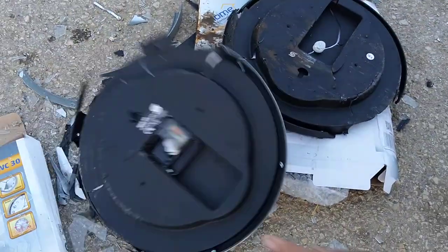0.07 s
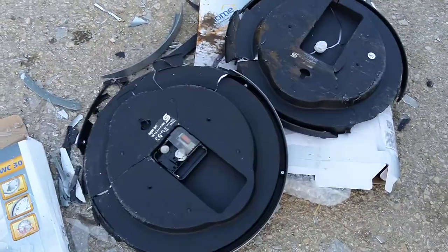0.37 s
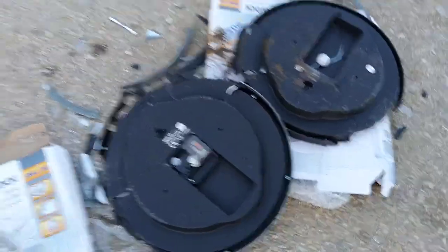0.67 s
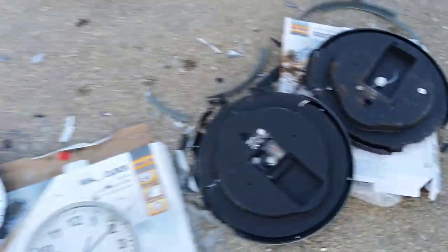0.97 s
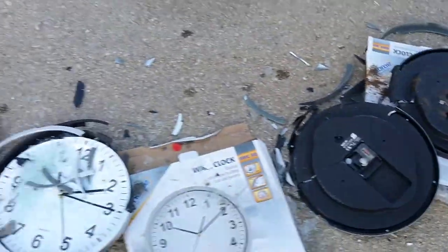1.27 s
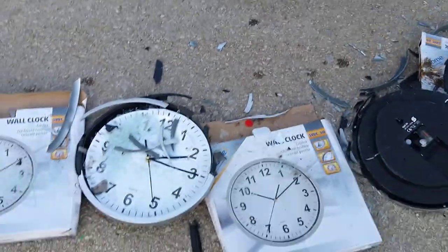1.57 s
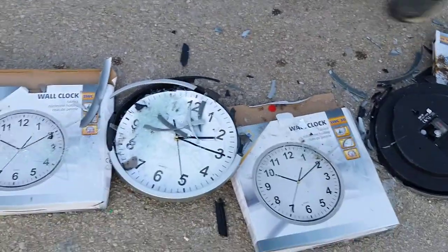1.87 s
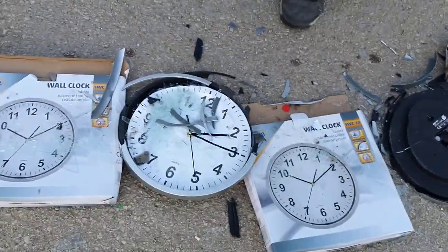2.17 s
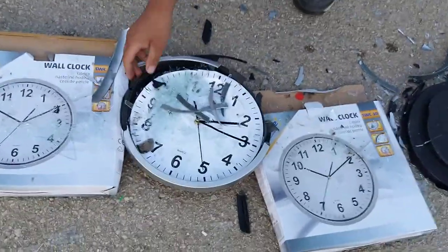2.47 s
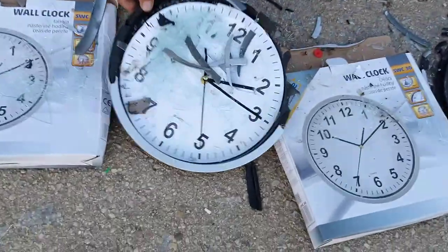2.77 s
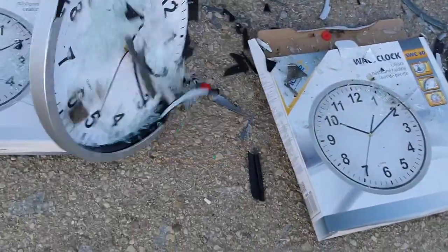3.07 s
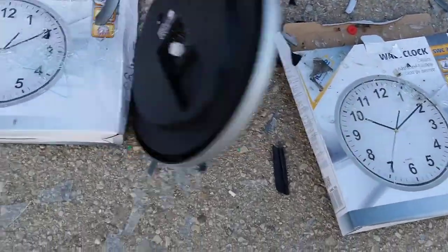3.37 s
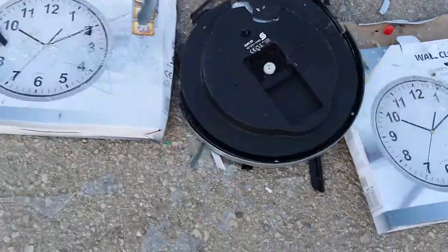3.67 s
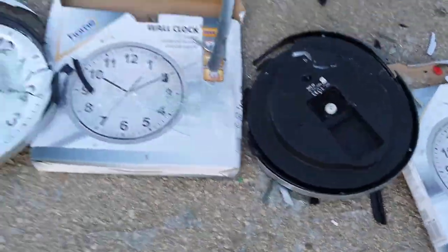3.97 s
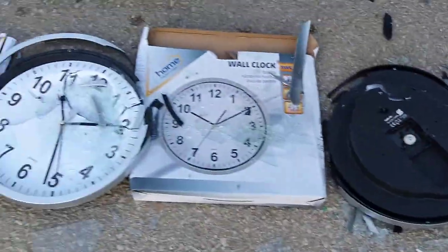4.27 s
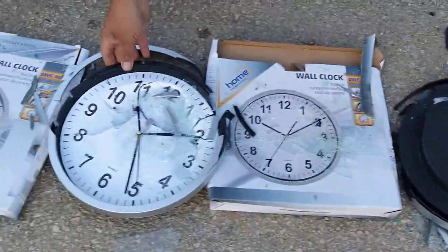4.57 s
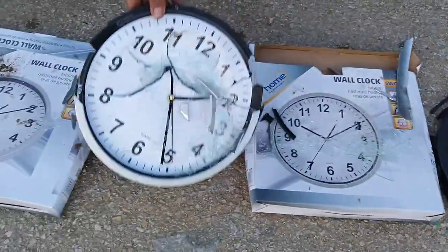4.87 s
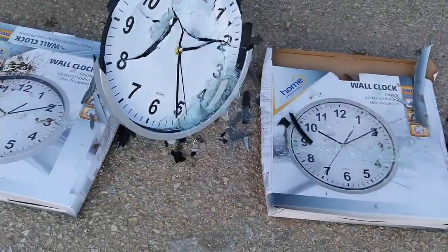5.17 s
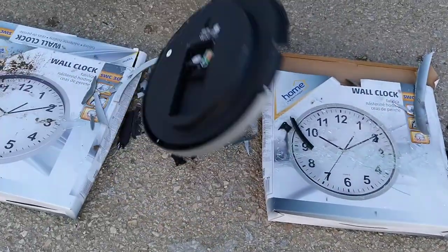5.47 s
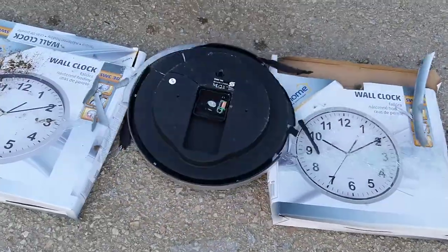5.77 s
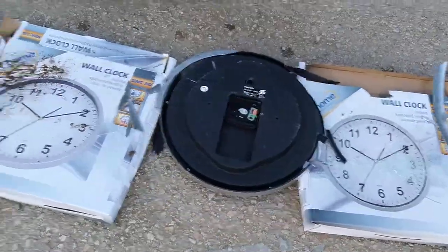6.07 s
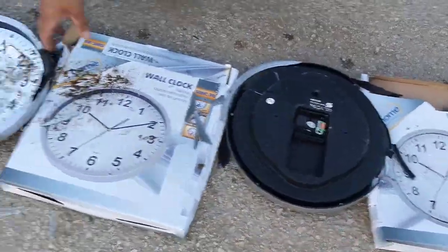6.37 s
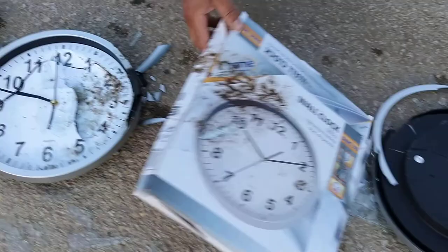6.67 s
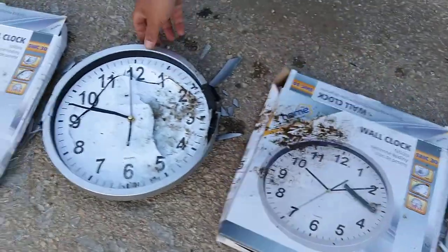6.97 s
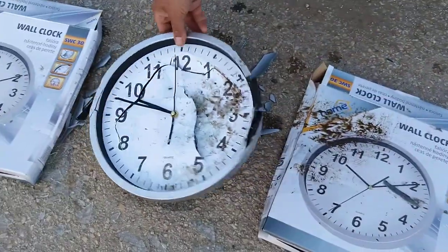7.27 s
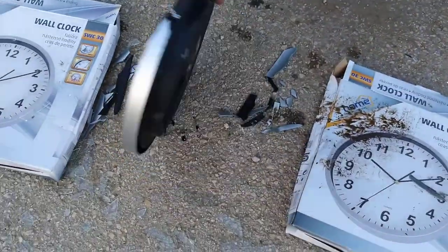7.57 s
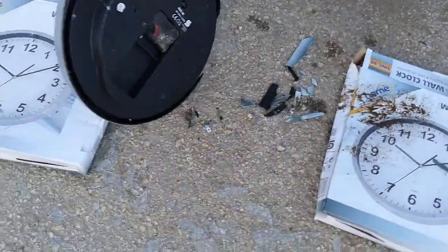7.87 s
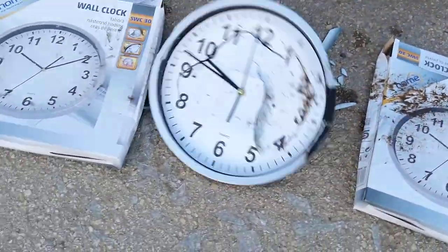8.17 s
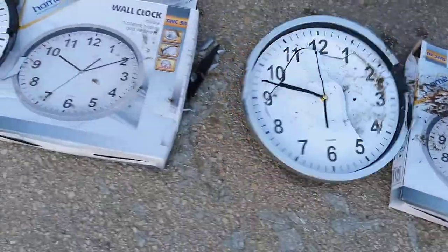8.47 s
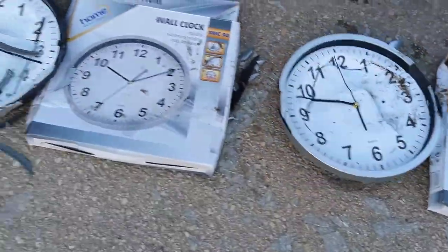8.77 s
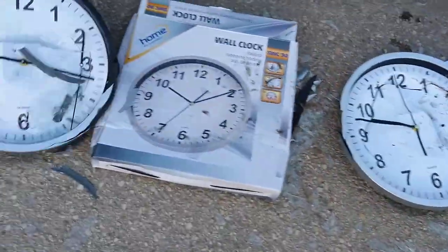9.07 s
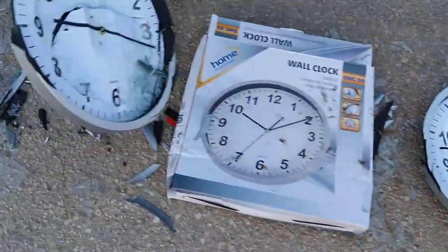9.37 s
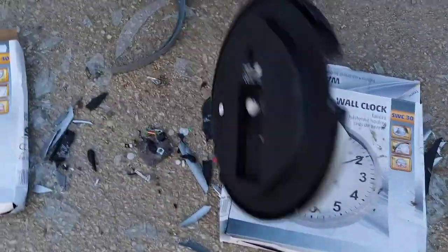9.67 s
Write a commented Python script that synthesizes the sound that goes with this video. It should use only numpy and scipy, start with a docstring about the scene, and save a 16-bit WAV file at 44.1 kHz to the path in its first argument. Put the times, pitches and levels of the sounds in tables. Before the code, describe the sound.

Smashed plastic clocks scrape, knock and crunch on gritty pavement, spilling tinkling glass as a breeze buffets the microphone.

```python
"""On rough pavement outdoors, smashed plastic wall clocks are lifted, turned over and dropped.
Their hollow cases scrape, knock and rock to rest; grit crunches and snaps under rims and shoes.
Broken glass slides out, ticking and ringing; larger shards land and tinkle.
A breeze buffets the nearby microphone over faint town noise."""
import sys
import numpy as np
from scipy import signal
from scipy.fft import rfft, irfft, next_fast_len
from scipy.io import wavfile
from scipy.ndimage import uniform_filter1d, map_coordinates

SR = 44100
rng = np.random.default_rng(int(sys.argv[2]) if len(sys.argv) > 2 else 0)


def store_pcm(level_fs):
    """Save levels as 16-bit WAV."""
    pcm = np.round(np.clip(level_fs, -1, 1) * 32767).astype(np.int16)
    wavfile.write(sys.argv[1], SR, np.atleast_2d(pcm).T)


N = 432621

# Spectrum of crushed grit. Each row: frequency in Hz, level in dB.
GRIT_SPECTRUM = [(700, -10.5), (1600, 5.5), (2300, 3), (4000, 2.5), (6200, -2), (7800, -2.5), (8600, -12.5),
                 (10500, -11.5), (13000, -21), (16000, -39)]
# Spectrum of the booming hollow case. Each row: frequency in Hz, level in dB.
HOLLOW_SPECTRUM = [(120, -26), (300, -22), (400, -7), (550, -1.5), (800, 0), (1000, -3.5), (1280, -4),
                   (1500, -14.5), (2400, -13.5), (5000, -39)]


def amp(db):
    """Decibels to gain."""
    return 10 ** (np.asarray(db) / 20)


def unit(x):
    """Scale to rms 1."""
    return x / np.sqrt(np.mean(x ** 2) + 1e-20)


def peaked(x):
    """Scale to peak 1."""
    return x / np.abs(x).max()


def along(points, hz):
    """Read (Hz, value) points on a log frequency axis."""
    knots_hz, values = np.transpose(points)
    return np.interp(np.log(hz + 1), np.log(knots_hz + 1), values)


def wobble(knots_per_s):
    """Smooth random curve."""
    knots = rng.standard_normal(int(N * knots_per_s / SR) + 4)
    fine = map_coordinates(knots, [np.arange(len(knots) * 10) / 10])
    return np.interp(np.arange(N) * knots_per_s * 10 / SR, np.arange(len(fine)), fine)


def filtered(x, response):
    """Apply a gain given as a function of Hz."""
    size = next_fast_len(x.shape[-1] + 8192, True)
    return irfft(rfft(x, size) * response(np.fft.rfftfreq(size, 1 / SR)), size)[..., :x.shape[-1]]


def coloured(x, spectrum, size=2048):
    """Minimum-phase filter that keeps the power of white noise."""
    gain = unit(amp(along(spectrum, np.fft.rfftfreq(size, 1 / SR))))
    cepstrum = irfft(np.log(gain))
    cepstrum[1:size // 2] *= 2
    cepstrum[size // 2 + 1:] = 0
    impulse = irfft(np.exp(rfft(cepstrum)))
    return signal.oaconvolve(x, impulse[None], axes=1)[:, :x.shape[-1]]


def add(track, start_s, sound):
    """Mix a sound into the track."""
    start = max(round(start_s * SR), 0)
    part = sound[..., :max(N - start, 0)]
    track[..., start:start + part.shape[-1]] += part


def burst(t60_s, size):
    """Dense modes dying together: a direct and a scattered channel, each of energy about 1."""
    noise = rng.standard_normal((2, size)) * amp(-60 * np.arange(size) / SR / t60_s)
    return unit(noise) / np.sqrt(size)


def impacts(per_s, spread_db, t60_s, points=3, size=1500):
    """Tiny uneven impacts at moving contact points, whose rings change from block to block."""
    count = int(per_s / points * N / SR) + 1
    out = np.zeros((2, N))
    for _ in range(points):
        strengths = amp(spread_db * np.clip(rng.standard_normal(count), -2, 2))
        strengths *= rng.choice([-1, 1], count)
        taps = np.bincount(rng.integers(0, N, count), strengths, N)
        for start in range(0, N, size):
            block = taps[None, start:start + size]
            add(out, start / SR, signal.fftconvolve(block, burst(t60_s, size), axes=1))
    return out


def chatter(sound, rebound_db, span_s, count):
    """A light touch, the main contact a tenth of the span in, then weakening uneven rebounds."""
    when = rng.random(count)
    rebounds = amp(rebound_db) * (1 - when) * rng.choice([-1, 1], count)
    delays = np.round(SR * span_s * np.r_[0, .1, .1 + when]).astype(int)
    taps = np.bincount(delays, np.r_[.2, 1, rebounds])
    return signal.fftconvolve(sound, taps[None], axes=1)


def swells(events, column, rise_db_per_s, sag_db_per_s, fall_db_per_s):
    """Gain from one dB column: each event rises to its start, sags over its length, then dies away."""
    t = np.arange(0, N, 64) / SR
    power = np.zeros(len(t))
    for event in events:
        age_s, length_s = t - event[0], event[1]
        db = event[column] + rise_db_per_s * np.minimum(age_s, 0)
        db -= sag_db_per_s * np.clip(age_s, 0, length_s)
        db -= fall_db_per_s * np.maximum(age_s - length_s, 0)
        power += amp(np.maximum(db, -150)) ** 2
    return np.interp(np.arange(N) / SR, t, np.sqrt(power))


def scrape_gain(column):
    """Envelope of a clock, its box or a shoe pushed over the ground."""
    # Each row: start in seconds, length in seconds, case level in dB, grit level in dB.
    scrapes = [(0.0, 0.052, -35, -36), (0.145, 0.075, -30.5, -33), (1.62, 0.167, -57, -68),
               (2.0, 0.15, -62, -71.5), (2.67, .14, -38.5, -48.5), (2.92, 0.089, -29, -27),
               (3.08, 0.17, -46, -26.5), (3.36, 0.27, -36, -37), (4.49, 0.17, -33.5, -45),
               (4.73, 0.069, -29, -39), (4.805, 0.055, -24.5, -24), (4.93, 0.27, -36.5, -28.5),
               (5.5, 0.15, -82, -37.5), (6.485, 0.15, -30, -38), (6.7, 0.388, -36, -42.5),
               (7.2, 0.0237, -35, -44.5), (7.39, 0.11, -32, -32.5), (7.57, 0.17, -51.5, -35.5),
               (7.81, 0.19, -31, -40.5), (8.03, 0.19, -31.5, -36.5), (8.54, 0.041, -29.5, -29.5),
               (8.78, 0.051, -31, -33.5), (8.91, 0.16, -41.5, -38.5), (9.04, 0.056, -27.5, -26),
               (9.18, .06, -38, -32.5), (9.3, 0.23, -43, -35), (9.77, .05, -24.5, -31)]
    return swells(scrapes, column, rise_db_per_s=217.5, sag_db_per_s=3, fall_db_per_s=176)


def grit_gain():
    """Envelope of the grit under scraping and rocking together."""
    return np.hypot(scrape_gain(column=3), rocking_gain(column=3))


def rim_on_pavement(rattle_db, boom_db, grit_db, judder_db, snaps_db):
    """A rim judders over stones: the case rattles, or booms as it rocks; grit grinds and snaps."""
    # Rattling case. Each row: frequency in Hz, level in dB.
    rattle_spectrum = [(120, -38.5), (310, -12), (450, -3), (750, 0.5), (1250, -1), (1700, -6.5),
                       (2400, -13), (5000, -40.5)]
    judder = amp(judder_db * wobble(55))
    taps = judder * impacts(per_s=1000, spread_db=4.5, t60_s=0.04)
    rattle = amp(rattle_db) * scrape_gain(column=2) * unit(coloured(taps, rattle_spectrum))
    boom = amp(boom_db) * rocking_gain(column=2) * unit(coloured(taps, HOLLOW_SPECTRUM))
    grinding = unit(judder * impacts(per_s=2800, spread_db=3, t60_s=0.012))
    grain_snaps = unit(impacts(per_s=87, spread_db=9.5, t60_s=0.014))
    grit = unit(coloured(grinding + amp(snaps_db) * grain_snaps, GRIT_SPECTRUM))
    return rattle + boom + amp(grit_db) * grit_gain() * grit


def sliding_glass(tick_db, ring_db, dust_db, mean_t60_s, count=260, size=3000):
    """Splinters slide out and tick together; loose ones skitter, each ringing at its own pitch."""
    # Each row: start in seconds, length in seconds, ticking level in dB, ringing level in dB.
    spills = [(0.0, .29, -39, -47), (3.19, 0.17, -21.5, -29), (3.42, 0.091, -39.5, -25),
              (3.57, .07, -34, -26), (4.73, 0.077, -42.5, -45), (4.8, 0.24, -31.5, -24),
              (5.06, 0.072, -33.5, -27), (5.3, 0.28, -40, -48.5), (5.59, 0.092, -35.5, -34.5),
              (6.58, 0.083, -41.5, -43), (6.84, 0.078, -36.5, -47.5), (7.5, 0.075, -45.5, -40),
              (7.7, 0.074, -29, -43), (8.08, 0.021, -32, -50), (9.03, 0.019, -30, -43),
              (9.43, 0.21, -45, -40), (9.77, .05, -36, -29)]
    # Each row: frequency in Hz, level in dB.
    glass_spectrum = [(2500, -11), (5000, 1), (7500, 5.5), (8600, 0), (10300, 8.5), (12500, -2.5),
                      (16000, -5.5)]
    tick_gain, ring_gain = (
        swells(spills, column, rise_db_per_s=171, sag_db_per_s=3.5, fall_db_per_s=143.5)
        for column in (2, 3))
    t = np.arange(size) / SR
    rings = np.zeros((2, N))
    for pitch, life in rng.random((count, 2)):
        hz = 7000 + 8000 * pitch
        decay = amp(-60 * t / (mean_t60_s * (.5 + life)))
        ring = np.sin(2 * np.pi * hz * t + rng.uniform(0, 2 * np.pi, (2, 1))) * decay
        skitter = chatter(ring, rebound_db=-14.5, span_s=.16, count=5)
        for when, strength in rng.random((8, 2)):
            add(rings, when * N / SR, strength * skitter)
    flow = np.hypot(tick_gain, amp(dust_db) * grit_gain())  # glass dust ticks along with the grit
    crackle = unit(impacts(per_s=2400, spread_db=5.5, t60_s=.008))
    ticks = unit(coloured(crackle, glass_spectrum))
    return amp(tick_db) * flow * ticks + amp(ring_db) * ring_gain * unit(coloured(rings, glass_spectrum))


def town(noise_db, hum_db, hum_hz):
    """Distant town noise with a faint wavering hum."""
    # Each row: frequency in Hz, level in dB.
    town_spectrum = [(15, -35.5), (25, 0), (74, -7), (394, -15.5), (624, -16), (1940, -28.5), (3160, -26.5),
                     (8140, -40), (16000, -56.5)]
    mid, side = coloured(rng.standard_normal((2, N)), town_spectrum)
    phase = 2 * np.pi * np.cumsum(hum_hz + 4 * wobble(30)) / SR
    hum = np.sin(phase) * amp(3.7 * wobble(3))
    return amp(noise_db) * (mid + .4 * np.array([side, -side])) + amp(hum_db) * hum


def turbulence(spectrum, size=2200):
    """Coloured noise held at an even strength, for the gusts to shape."""
    air = coloured(rng.standard_normal((1, N)), spectrum)
    return air / np.sqrt(np.abs(uniform_filter1d(air ** 2, size)) + 1e-9)


def breeze(rumble_db, flutter_db, lumps_db):
    """Wind buffets both microphone ports alike: a light flow, and puffs that rumble and flutter."""
    # Light flow. Each row: time in seconds, level in dB.
    flow_levels = [(0, -62.5), (2.42, -61), (2.5, -40), (4.45, -48), (5.6, -43), (6.25, -36.5),
                   (6.45, -54.5), (6.8, -53), (7.1, -36.5), (9.8, -39.5)]
    # Each row: start in seconds, length in seconds, rumble level in dB, flutter level in dB.
    gusts = [(2.51, 0.095, -50, -61), (3.31, .09, -33, -42.5), (4.22, 0.027, -34.5, -46.5),
             (4.66, 0.034, -35.5, -39.5), (5.46, 0.19, -36, -42), (5.69, 0.12, -34.5, -33.5),
             (6.15, 0.023, -32, -28.5), (6.62, 0.02, -41.5, -56), (7.04, 0.013, -29.5, -37.5),
             (7.18, .03, -32, -34), (7.73, 0.058, -36, -34), (8.18, 0.029, -27, -30.5),
             (8.66, 0.088, -31.5, -39), (8.94, 0.067, -30, -30)]
    # Each row: frequency in Hz, level in dB.
    rumble_spectrum = [(15, -27), (30, -11), (52, 5.5), (100, 0.5), (190, -12.5), (300, -30), (600, -65.5)]
    # Each row: frequency in Hz, level in dB.
    flutter_spectrum = [(50, -33), (110, 1), (160, 0.5), (220, -3.5), (320, -17.5), (600, -59)]
    rumble_gain, flutter_gain = (
        swells(gusts, column, rise_db_per_s=451.5, sag_db_per_s=10, fall_db_per_s=305)
        for column in (2, 3))
    flow_db = np.interp(np.arange(N) / SR, *np.transpose(flow_levels)) + lumps_db * wobble(16)
    rumble = amp(rumble_db) * np.hypot(amp(flow_db), rumble_gain) * turbulence(rumble_spectrum)
    return rumble + amp(flutter_db) * flutter_gain * turbulence(flutter_spectrum)


def knocks(body_gain_db, crack_gain_db, modes_db, modes_t60_s, span_s, size=7000):
    """A case or shoe strikes the ground: the hollow case rings, grit cracks, and both chatter."""
    # Each row: time in seconds, body level in dB, crack level in dB, strongest mode in Hz.
    blows = [(0.163, -5, -14.5, 550), (0.19, -8, -21.5, 595), (0.275, -14.5, -30.5, 602),
             (0.431, -25, -39, 602), (0.534, -38.5, -49.5, 880), (0.811, -46, -53.5, 650),
             (1.135, -39.5, -60, 1130), (1.169, -26, -41, 566), (1.189, -22, -41.5, 607),
             (1.298, -40.5, -53, 564), (1.575, -35.5, -71, 514), (1.751, -42, -52, 900),
             (2.377, -36, -67, 537), (2.532, -27, -38.5, 1213), (2.706, -27.5, -29.5, 720),
             (2.852, -15, -37.5, 750), (3.609, -6.5, -8.5, 584), (3.645, -13, -24, 767),
             (3.744, -7.5, -30, 800), (3.875, -18.5, -49, 1200), (4.16, -33.5, -76, 720),
             (4.7133, -15, -18, 644), (5.339, -25.5, -24.5, 775), (5.624, -5.5, -11, 599),
             (5.817, -22, -19.5, 750), (6.303, -43, -44, 744), (6.427, -24.5, -31, 1255),
             (6.986, -5.5, -20.5, 598), (7.008, -11, -29, 874), (7.152, -22.5, -26, 750),
             (7.315, -17, -27.5, 690), (7.364, -11.5, -20.5, 1510), (7.782, -16, -36, 614),
             (7.802, -17, -35, 1480), (7.866, -10.5, -26, 1554), (7.912, -7, -23.5, 549),
             (7.935, -12, -32.5, 1405), (8.077, -19, -21, 1284), (8.128, -14.5, -19, 1396),
             (8.261, -9.5, -18.5, 704), (8.237, -3, -25.5, 617), (8.278, -6.5, -12.5, 760),
             (8.31, -8, -27.5, 1840), (8.35, -14.5, -25, 1503), (8.465, -18.5, -19.5, 650),
             (8.531, -8, -14.5, 730), (8.55, -15, -19, 924), (8.582, -13.5, -20, 748),
             (8.62, -11.5, -18.5, 942), (8.666, -10.5, -14.5, 1330), (8.709, -10.5, -15, 1350),
             (8.971, -20.5, -20.5, 1310), (9.02, -22, -21, 1390), (9.103, -17, -37, 1010),
             (9.516, -19.5, -45, 650), (9.614, -18, -47, 700), (9.648, -16, -29.5, 800),
             (9.716, -20, -35, 1177), (9.752, -8, -28, 660), (9.785, -8, -27, 741)]
    # Plastic case. Each row: nominal frequency ratio to the strongest mode, level in dB.
    case_modes = [(0.88, -6.5), (1, -1.5), (1.139, -10), (1.38, -12.5), (1.9, -15.5), (2.3, -15)]
    t = np.arange(size) / SR
    ratios, levels_db = np.transpose(case_modes)[:, :, None]
    modes_envelope = amp(-60 * t / modes_t60_s) * (1 - np.exp(-t / 0.00065))
    crack_attack = 1 - np.exp(-t / 0.0012)
    out = np.zeros((2, N))
    for time_s, body_db, crack_db, hz in blows:
        strengths = amp(levels_db + 2 * rng.standard_normal(levels_db.shape))
        modes_hz = hz * ratios ** rng.uniform(0.77, 1.15, ratios.shape)  # each grip bends the case anew
        phases = rng.uniform(0, 2 * np.pi, (2, len(ratios), 1))
        modes = np.sum(strengths * np.sin(2 * np.pi * modes_hz * t + phases), axis=1) * modes_envelope
        boom = coloured(burst(t60_s=0.043, size=size), HOLLOW_SPECTRUM)
        body = unit(boom) + amp(modes_db) * unit(modes)
        crack = coloured(burst(t60_s=0.024, size=size) * crack_attack, GRIT_SPECTRUM)
        body = peaked(chatter(body, rebound_db=-5.5, span_s=span_s, count=4))
        crack = peaked(chatter(crack, rebound_db=-5, span_s=span_s, count=9))
        add(out, time_s - span_s / 10, amp(body_db + body_gain_db) * body)
        add(out, time_s - span_s / 10, amp(crack_db + crack_gain_db) * crack)
    return out


def snaps(ring_db, ring_t60_s, size=3000):
    """A splinter or stone breaks under a rim or shoe: a sharp click and a short, weak ring."""
    # Each row: time in seconds, peak level in dB.
    breaks = [(0.165, -5), (1.1806, -15.5), (2.12, -33.5), (2.369, -41), (2.431, -39), (2.665, -28),
              (3.119, -12.5), (3.276, -16.5), (5.092, -16.5), (6.779, -15), (6.922, -25), (8.104, -10),
              (8.313, -8), (8.532, -8.5)]
    out = np.zeros((2, N))
    for time_s, db in breaks:
        click = burst(t60_s=0.0047, size=size) + amp(ring_db) * burst(ring_t60_s, size)
        add(out, time_s, amp(db) * peaked(coloured(click, GRIT_SPECTRUM)))
    return out


def shards(ring_db, tick_db, second_mode_db, chafe_s, span_s, size=12000):
    """A larger shard lands and skitters; its two plate modes chafe on the stone, then ring free."""
    # Each row: time in seconds, peak level in dB, main mode in Hz, second mode in Hz, T60 in seconds.
    landings = [(0.222, -19.5, 8010, 10600, 0.17), (3.185, -11, 7490, 14270, 0.13),
                (3.2951, -16, 9100, 11050, 0.09), (3.384, -12, 8880, 11480, 0.13),
                (3.5492, -7, 5266, 7500, 0.055), (3.85, -25, 11100, 9200, 0.089),
                (3.922, -10.5, 6654, 7700, 0.11), (3.926, -21, 5230, 7850, 0.13),
                (4.808, -9, 9500, 10800, 0.04), (4.988, -10.5, 8050, 11430, 0.038),
                (5.0576, -11, 9830, 7500, 0.025), (5.264, -22.5, 9650, 10800, 0.073),
                (5.308, -20, 7283, 12760, 0.5), (5.5666, -1, 6263, 10120, 0.058),
                (5.608, -8.5, 6300, 4580, 0.03), (5.627, -18, 8093, 10300, .2),
                (5.819, -12, 9600, 8093, 0.035), (7.526, -9, 6570, 5600, 0.014)]
    # Glass ticking on stone. Each row: frequency in Hz, level in dB.
    tick_spectrum = [(2500, -11), (5000, 2), (7500, 0), (11000, 0), (13000, -9.5), (16000, -19)]
    t = np.arange(size) / SR
    mode_gains = amp([[0], [second_mode_db]])
    attack = 1 - np.exp(-t / 0.0004)
    out = np.zeros((2, N))
    for time_s, db, main_hz, second_hz, t60_s in landings:
        phases = rng.uniform(0, 2 * np.pi, (2, 2, 1))
        chafe = unit(uniform_filter1d(rng.standard_normal((2, size)), 130)) * np.exp(-t / chafe_s)
        modes = np.sin(2 * np.pi * np.outer([main_hz, second_hz], t) + phases + chafe / 2)
        ring = np.sum(mode_gains * modes * amp(2 * chafe), axis=1) * amp(-60 * t / t60_s)
        tick = peaked(coloured(burst(t60_s=0.016, size=size), tick_spectrum))
        clink = (amp(ring_db) * ring + amp(tick_db) * tick) * attack
        skitter = chatter(clink, rebound_db=-7, span_s=span_s, count=4)
        add(out, time_s - span_s / 10, amp(db) * peaked(skitter))
    return out


def rocking_gain(column, taps_per_s=34, fade_db_per_tap=8):
    """Envelope of a dropped clock rocking to rest on its rim, fading between uneven taps."""
    # Each row: start in seconds, length in seconds, case level in dB, grit level in dB.
    rocks = [(0.23, 0.065, -30.5, -33.5), (0.44, 0.017, -45, -52.5), (1.2, 0.02, -49.5, -59.5),
             (3.62, 0.017, -28, -25.5), (3.71, 0.14, -26, -44.5), (3.94, 0.064, -36, -55.5),
             (5.65, 0.2, -21.5, -28.5), (5.88, 0.093, -33.5, -43.5), (8.24, 0.06, -28, -28.5),
             (9.752, .1, -17.5, -32.5)]
    tap_count = np.cumsum(taps_per_s * amp(2 * wobble(20))) / SR
    taps = unit(amp(-fade_db_per_tap * (tap_count % 1)))
    return taps * swells(rocks, column, rise_db_per_s=502, sag_db_per_s=14.5, fall_db_per_s=130)


def microphone_ports(debris, ahead_db):
    """The debris lies to the left: the right port hears it later, weaker and partly scattered."""
    # Left port's lead as the microphone turns. Each row: time in seconds, lead in seconds.
    leads = [(0.5, .0005), (0.7, 0.00011), (2.3, 0.0001), (2.6, .00048), (3.3, 0.00053), (3.65, 0.0002),
             (4.7, 0.0003), (5.2, 0.0006), (5.6, 0.00021), (6.9, 0.00021), (7.5, 0.000483), (8.3, .0005),
             (8.6, 0.00025), (9.25, 0.0006), (9.7, 0.00029)]
    # Response common to both ports. Each row: frequency in Hz, gain in dB.
    port_response = [(100, 1), (400, 0.5), (1100, 4.5), (2000, -1), (5000, 4)]
    # Right port's loss for a sound far to the left. Each row: frequency in Hz, loss in dB.
    shadow = [(120, 7), (400, 4.5), (900, 11), (2000, 12.5), (4000, 14.5), (8000, 20), (14000, 24)]
    direct, scattered = debris
    spread = filtered(scattered, lambda hz: amp(along([(500, -9), (3000, 7.5)], hz)))
    samples = np.arange(N)
    lead_samples = np.interp(samples / SR, *np.transpose(leads)) * SR
    right = map_coordinates(direct + spread, [samples - lead_samples])
    right *= amp(ahead_db * (1 - lead_samples / lead_samples.max()))  # louder towards straight ahead
    return filtered(np.array([direct, right]),
                    lambda hz: amp(along(port_response, hz) - np.outer([0, 1], along(shadow, hz))))


def reflections(x, wet_db, t60_s):
    """Add the weak scattered answer of the ground and far walls."""
    tail = np.pad(burst(t60_s, size=16000), ((0, 0), (400, 0)))
    return x + amp(wet_db) * signal.oaconvolve(x, tail, axes=1)[:, :N]


def scene():
    """Clocks, grit and glass on the left, with wind and town noise."""
    debris = rim_on_pavement(rattle_db=0, boom_db=-1.5, grit_db=1.87, judder_db=2.5, snaps_db=-8)
    debris += sliding_glass(tick_db=-1.05, ring_db=-2, dust_db=-11.5, mean_t60_s=.06)
    debris += knocks(body_gain_db=1.5, crack_gain_db=5, modes_db=-0.5, modes_t60_s=.038, span_s=.025)
    debris += snaps(ring_db=-5, ring_t60_s=0.033)
    debris += shards(ring_db=-5, tick_db=-4, second_mode_db=-7, chafe_s=0.045, span_s=0.037)
    mix = reflections(microphone_ports(debris, ahead_db=5.5), wet_db=-16, t60_s=.13)
    mix += breeze(rumble_db=-1.14, flutter_db=-2.5, lumps_db=4.5)
    return mix + town(noise_db=-64.5, hum_db=-71.5, hum_hz=630)


def record(dry):
    """Hard limit at full scale, then a brick-wall low-pass."""
    return filtered(np.clip(dry, -1, 1), lambda hz: hz < 16050)


dry = scene()
out = record(dry)
store_pcm(out)
```